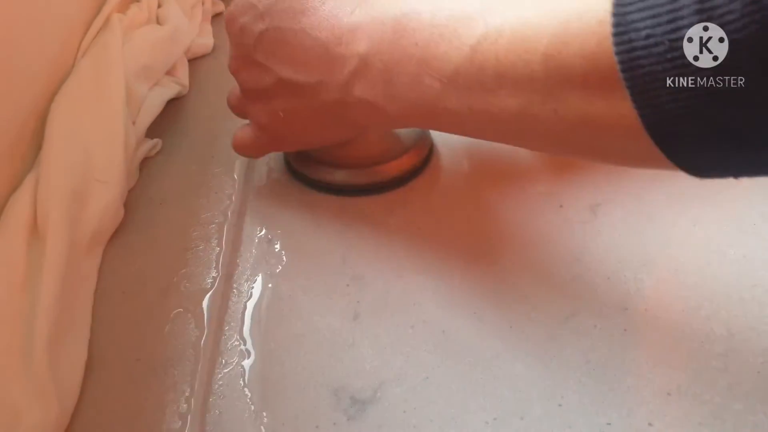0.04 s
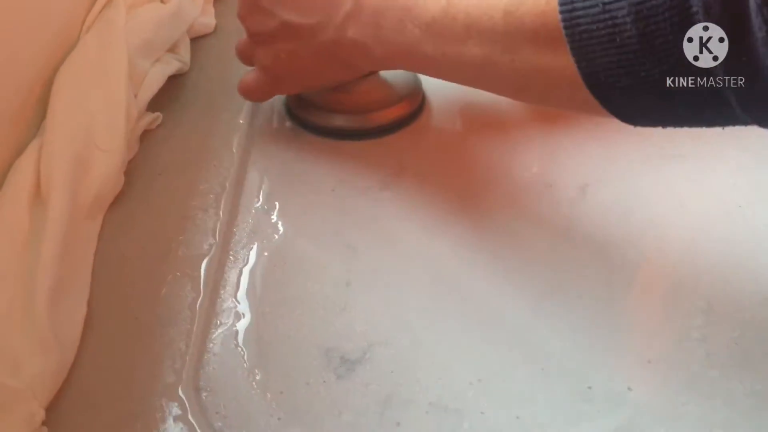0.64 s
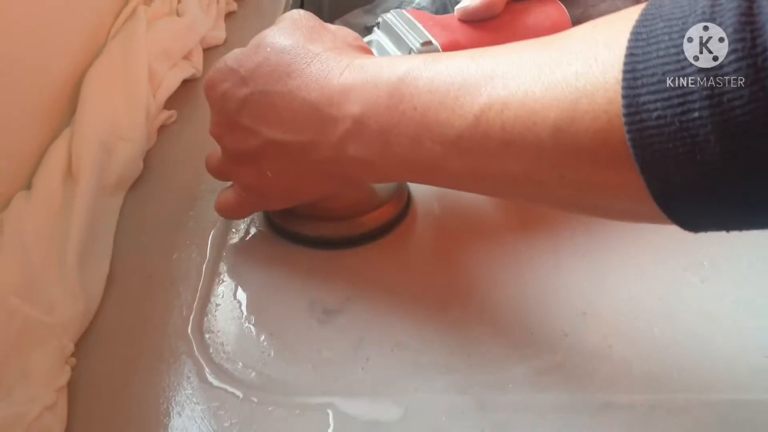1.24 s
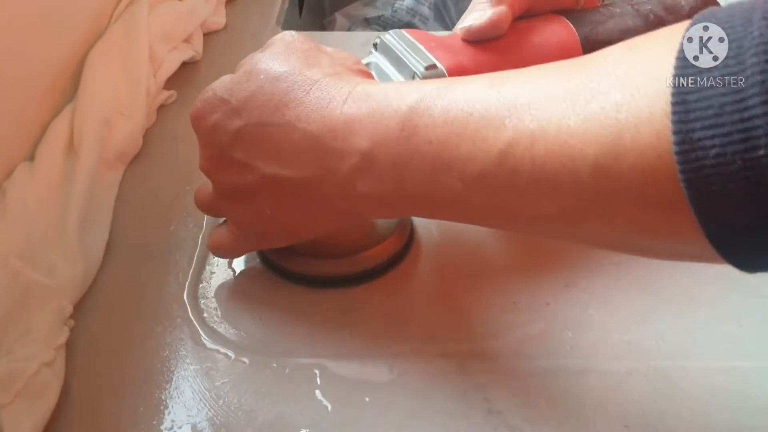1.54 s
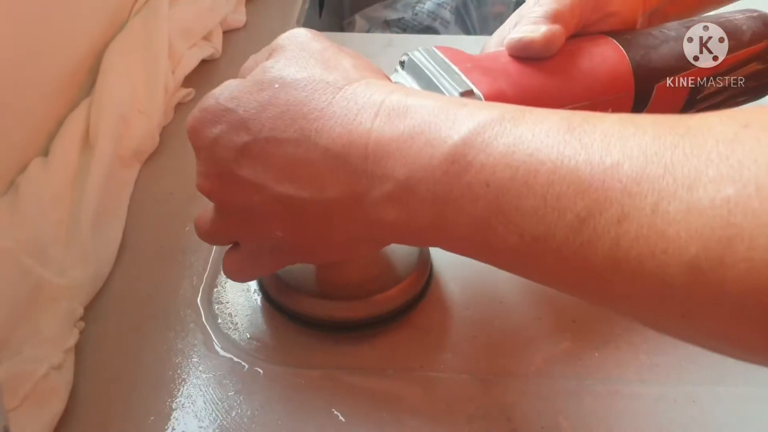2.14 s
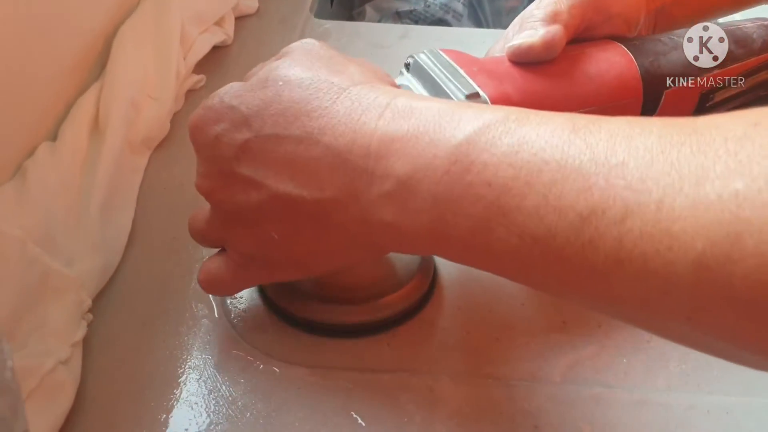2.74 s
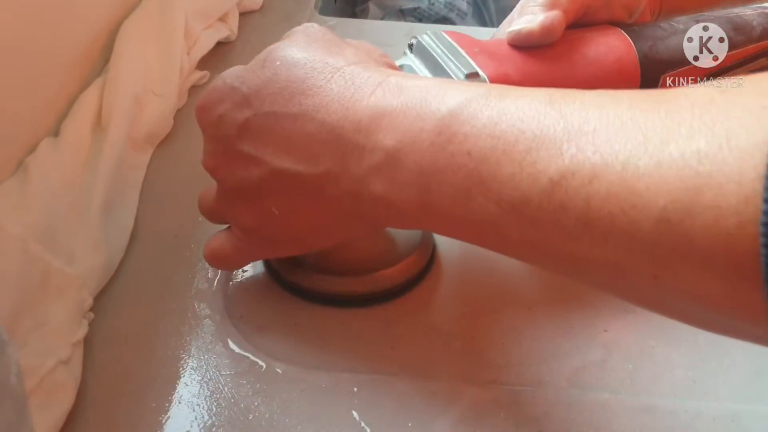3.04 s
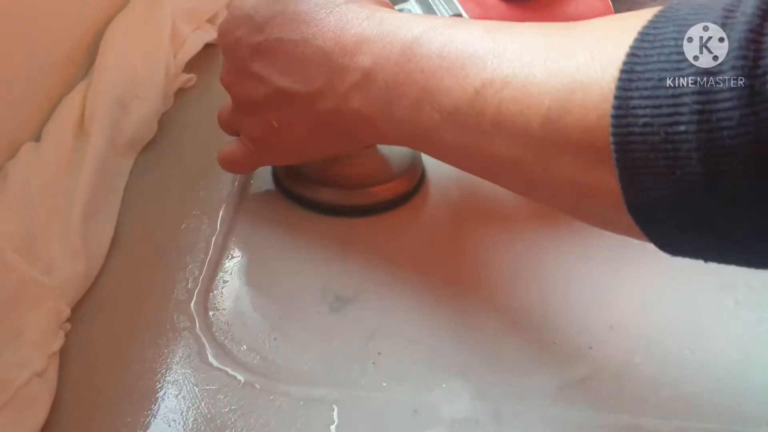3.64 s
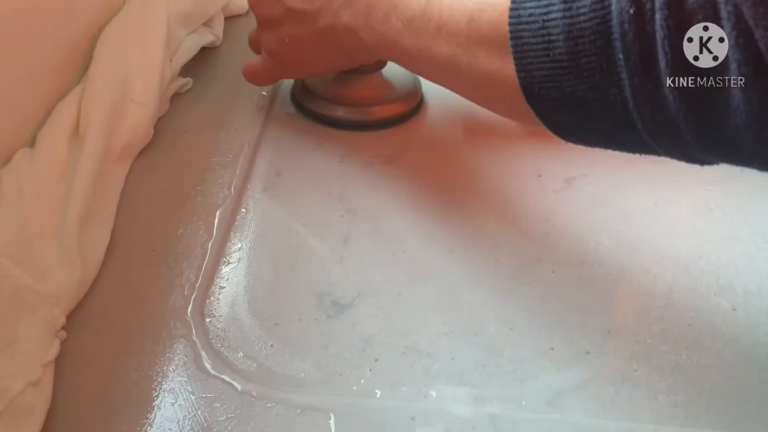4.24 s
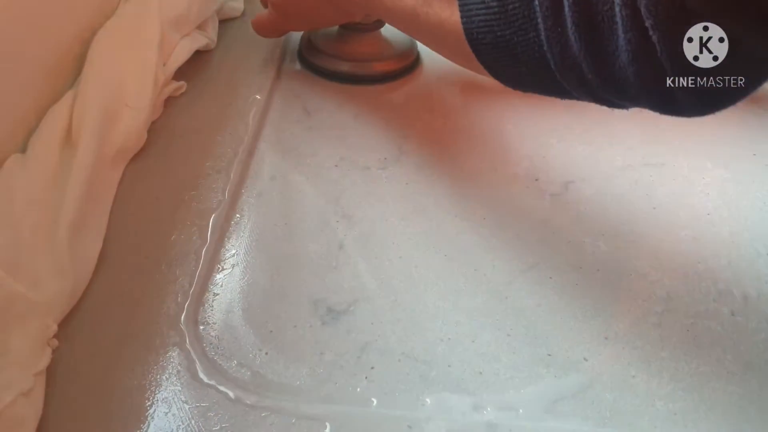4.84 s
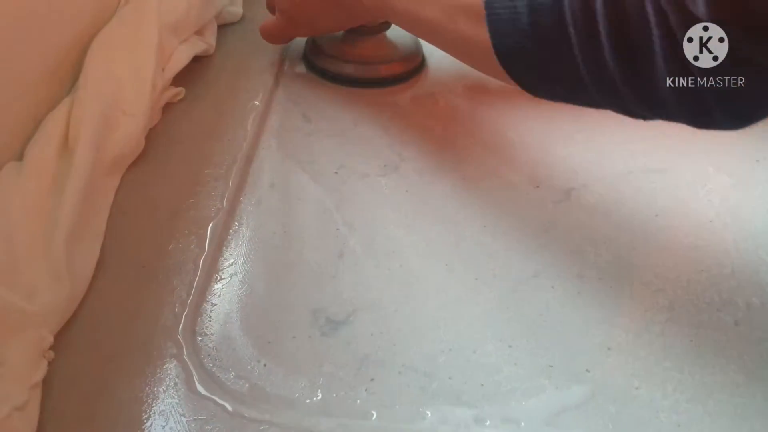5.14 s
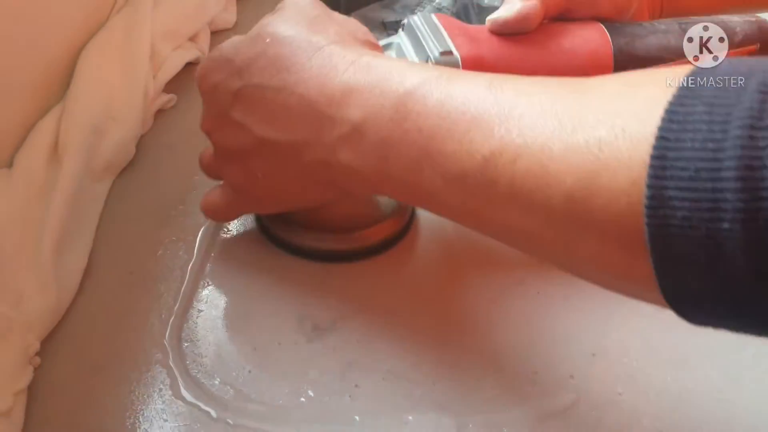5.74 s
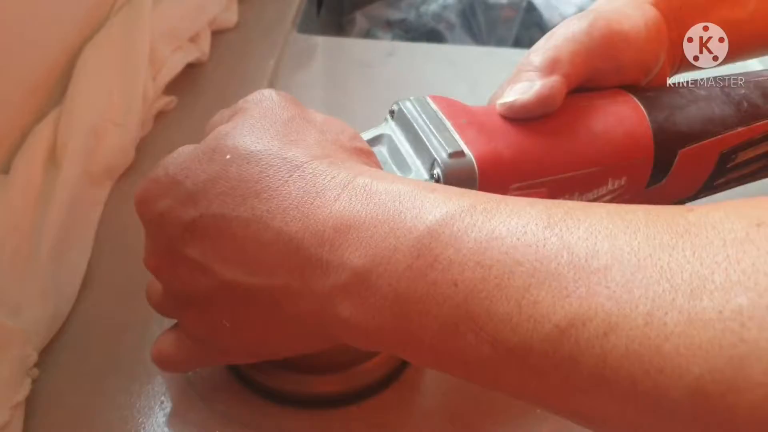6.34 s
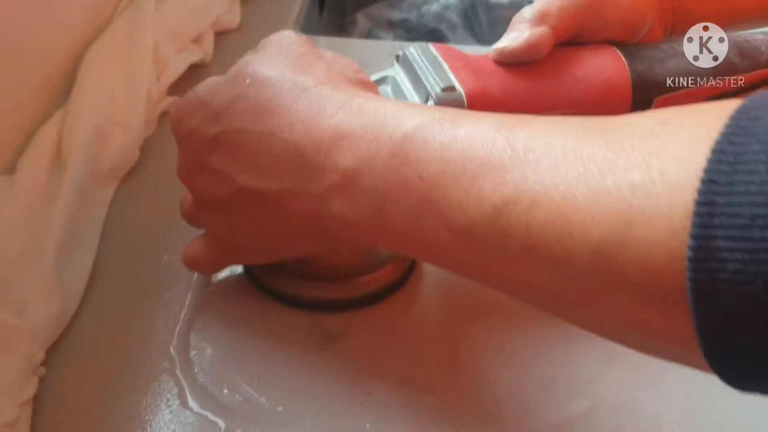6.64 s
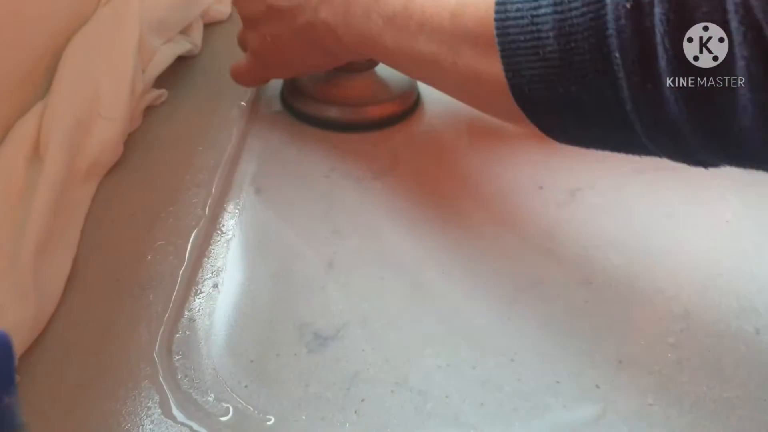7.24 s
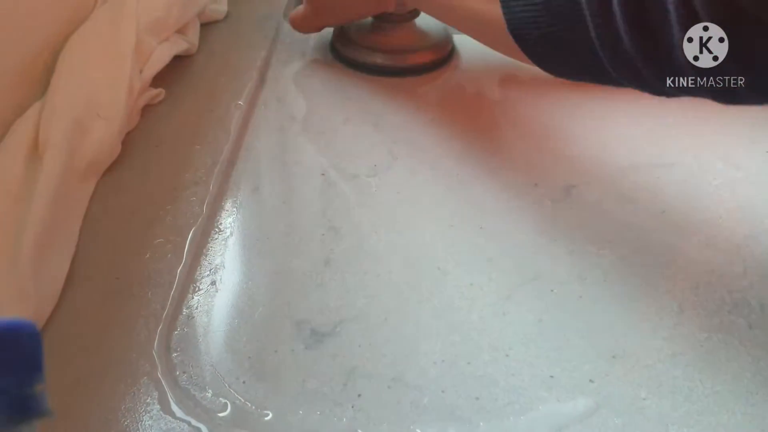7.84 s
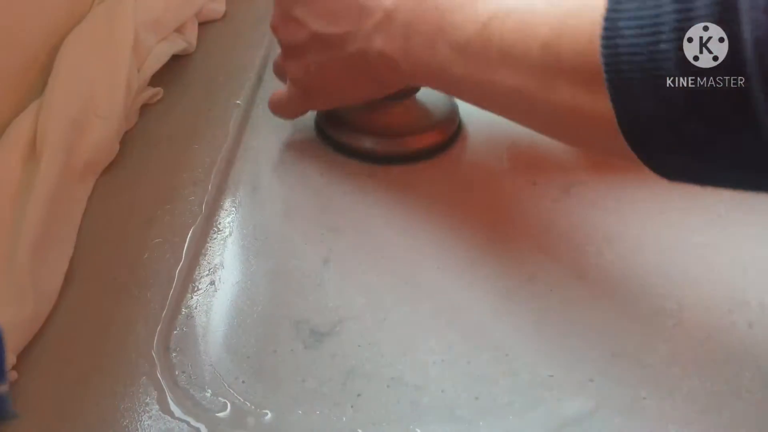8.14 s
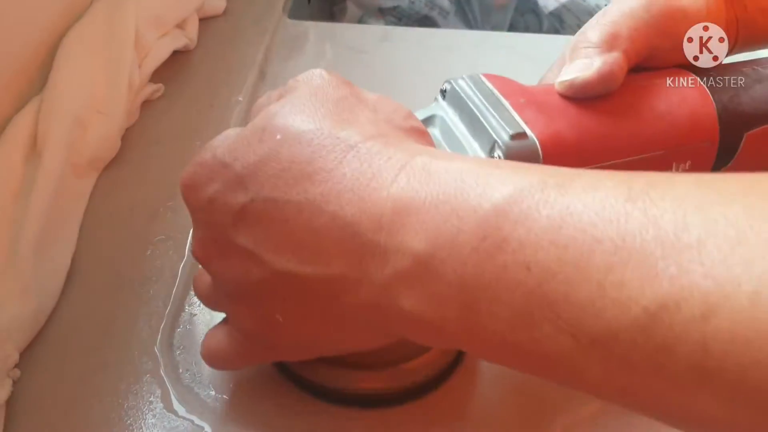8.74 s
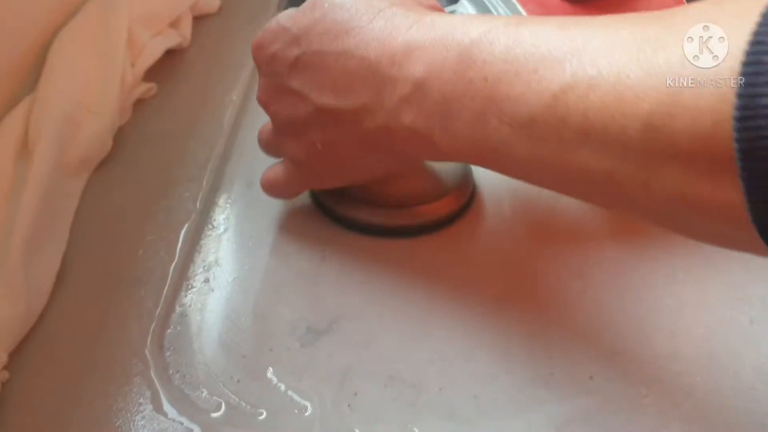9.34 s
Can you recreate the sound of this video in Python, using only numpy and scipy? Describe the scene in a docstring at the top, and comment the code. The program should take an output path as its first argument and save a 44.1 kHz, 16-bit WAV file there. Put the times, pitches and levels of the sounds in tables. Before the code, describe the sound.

A handheld orbital sander works a wet panel with a harsh, rattling buzz and hiss over a low hum. About two seconds in the pressure eases: the hum drops away, the gears clack lightly and the motor speeds up with a faint whine. The hum returns and sanding continues, swelling and fading with each stroke, with a few faint high squeaks of grit. It is heard close, mostly on the left, in a small room.

```python
"""A low hum under a harsh buzz: a handheld orbital sander on a wet panel, close by in a small room.
The pad's orbit makes the panel hum and rubs through slurry. The speed control fires the motor on every
half cycle of the mains, so gears and brushes buzz in surges. About two seconds in, the hand eases off
once: the hum drops away, slack gears clack, and the unloaded motor speeds up and whines.
The left microphone is close to the tool; the right one hears it weaker, with more of the walls."""
import sys
import numpy as np
from scipy import signal
from scipy.fft import rfft, irfft, next_fast_len
from scipy.io import wavfile
from scipy.ndimage import uniform_filter1d, map_coordinates

SR = 44100
rng = np.random.default_rng(int(sys.argv[2]) if len(sys.argv) > 2 else 0)


def unload_wav(signal):
    """Save mono or channel-first audio to the path in sys.argv[1] as 16-bit WAV at rate SR, clipped to [-1, 1]."""
    wavfile.write(
        sys.argv[1],
        SR,
        np.round(np.clip(np.atleast_2d(signal).T, -1, 1) * 32767).astype(np.int16),
    )


N = 418495
FIRING_HZ, FIRST_FIRING_S = 99.938, .0082  # one firing per half cycle of the mains
PINION_TEETH, WHEEL_TEETH = 11, 39
TOP_HZ = 15650


def amp(db):
    """Decibels to gain."""
    return 10 ** (np.asarray(db) / 20)


def unit(x):
    """Scale to rms 1."""
    return x / np.sqrt(np.mean(x ** 2) + 1e-20)


def along(points, hz):
    """Interpolate (Hz, value) points on a log frequency axis."""
    freqs, values = np.transpose(points)
    return np.interp(np.log(hz + 1), np.log(freqs + 1), values)


def curves(rows):
    """One value per sample for each column after the time."""
    times, *columns = np.transpose(rows)
    return [np.interp(np.arange(N) / SR, times, column) for column in columns]


def wobble(rate):
    """A smooth random curve, rate knots a second."""
    knots = rng.standard_normal(int(N * rate / SR) + 4)
    return map_coordinates(knots, [np.arange(N) * rate / SR])


def filtered(x, response):
    """Pass x through a complex response of frequency."""
    size = next_fast_len(N + SR // 4, True)
    return irfft(rfft(x, size) * response(np.fft.rfftfreq(size, 1 / SR)), size)[..., :N]


def coloured(x, spectrum):
    """Shape x by (Hz, dB) points, at rms 1."""
    return unit(filtered(x, lambda f: amp(along(spectrum, f))))


def resonance(f, hz, width):
    """Response of one damped mode."""
    return 1j * f * width / (hz * hz - f * f + 1j * f * width)


def impacts(per_second):
    """Dense random contacts of random size."""
    return rng.standard_normal(N) * (rng.random(N) < per_second / SR)


def on_spot(near, spot, reach):
    """1 with the pad on a spot, fading to either side."""
    return np.exp(-((near - spot) / reach) ** 2)


def since_firing():
    """Seconds since the speed control last fired."""
    return (np.arange(N) / SR - FIRST_FIRING_S) * FIRING_HZ % 1 / FIRING_HZ


def surge(peak_s, depth_db):
    """Gain that swells once in each half cycle of the mains."""
    return unit(amp(depth_db * np.cos(2 * np.pi * FIRING_HZ * (since_firing() - peak_s))))


# The pad's path over the panel. Each row: time in seconds, nearness from 0 (far end) to 1 (near end),
# offset from 0 (left edge) to 1 (right edge).
PAD_PATH = [(0, 0.15, 0.78), (.3, 0.39, 0.74), (.55, 0.16, 0.54), (1, 0.36, 0.4), (1.6, 0.63, .2),
            (2.85, 0.8, 0.2), (3.75, 0.39, 0.1), (4.35, 0.17, 0.06), (5.2, 0.01, 0.22), (6.27, 0.95, 0.24),
            (7.05, 0.35, 0.24), (7.5, 0.09, 0.76), (8.02, 0.02, 0.98), (8.75, 0.92, 1), (9.49, 0.54, 0.71)]


def stroke(turn_s=0.42):
    """The hand turns round gently: nearness, offset, and pulling speed in stroke lengths a second."""
    near, offset = (uniform_filter1d(c, int(turn_s * SR), mode="nearest") for c in curves(PAD_PATH))
    return near, offset, np.gradient(near) * SR


# How hard the hand leans on the pad. Each row: time in seconds, pressure in dB.
HAND_PRESSURE = [(0, 5.5), (.3, 4), (1.15, 3.5), (1.68, -3.5), (1.82, -50.5), (2.3, -92), (2.56, -68),
                 (2.62, -40), (2.71, -37), (2.76, -20), (2.95, -6.5), (3.2, 2), (5.5, -2), (6.6, 1.5),
                 (8.3, -4), (9.2, 1)]
FULL_LOAD_DB, IDLE_LOAD = -12.5, .3  # pressure that loads the motor fully; share left when lifted


def loading(db_per_db=0.495):
    """Share of full load on the motor, growing with the hand's pressure."""
    pressure_db, = curves(HAND_PRESSURE)
    return np.clip(amp(db_per_db * (pressure_db - FULL_LOAD_DB)), IDLE_LOAD, 1)


def idling():
    """0 while the motor works, 1 while it runs free."""
    return uniform_filter1d((1 - loading()) / (1 - IDLE_LOAD), size=SR // 12)


# The speed control's drifting setting. Each row: time in seconds, rotor turns a second.
SPEED_SETTING = [(0, 165.4), (1.8, 165.3), (4.3, 164), (5.5, 165), (6.7, 165.1), (8.1, 163.8), (9.2, 165.2)]


def rotor_speed(governor_s=1.15, near_gain_hz=.6, free_gain_hz=6.8):
    """The freed rotor races; the speed control slowly reins it in, so it sags when the load returns."""
    free = idling()
    step = 1 / (governor_s * SR)
    reined = signal.lfilter([step], [1, step - 1], free)
    setting, = curves(SPEED_SETTING)
    return setting + near_gain_hz * stroke()[0] + free_gain_hz * (free - reined) + 0.1995 * wobble(12)


# The small room around the microphones. Each row: frequency in Hz, seconds to die away by 60 dB.
ROOM_DECAY = [(200, .16), (2000, .17), (12000, .13)]


def room(x):
    """The nearby walls give each microphone its own tail, which changes as the tool moves."""
    out, step = np.zeros((2, N + 2 * SR)), SR // 4
    padded, fade = np.pad(x, (step, 2 * step)), np.sqrt(np.hanning(2 * step))
    for start in range(0, N + step, step):
        hz, t, noise = signal.stft(rng.standard_normal((2, SR // 5)), SR, nperseg=256)
        decay = amp(-60 * t / along(ROOM_DECAY, hz)[:, None])
        tail = signal.istft(noise * decay, SR, nperseg=256)[1]
        piece = fade * padded[start:start + 2 * step]
        wet = signal.fftconvolve(piece[None], tail / np.linalg.norm(tail[0]), axes=1)
        out[:, start:start + wet.shape[1]] += wet
    return out[:, step:step + N]


# Air from the tool's fan, heard close. Each row: frequency in Hz, relative level in dB.
FAN_SPECTRUM = [(25, -38), (130, -34), (220, -9), (330, 1.5), (430, -2.5), (600, -2.5), (880, -8.5),
                (1100, 2.5), (2100, 0), (3000, -2), (4500, -15.5), (5600, -5.5), (7000, -16), (8500, -18),
                (15000, -28)]


def fan(level_db):
    """The cooling fan blows a steady rush of air."""
    return amp(level_db) * coloured(rng.standard_normal(N), FAN_SPECTRUM)


# Squeaks from under the pad. Each row: start in seconds, relative level in dB, pitch in Hz.
GRIT_SQUEAKS = [(0.6195, -27, 10900), (1.048, -33, 11700), (2.202, -23, 11800), (2.1241, -35, 10800),
                (2.5386, -30, 11700), (4.0093, -31.5, 11600), (4.3904, -32.5, 11600), (5.87, -27, 11900),
                (8.6018, -31, 11710), (8.8922, -32, 10800)]


def grit(gain_db, t60_s):
    """Grit trapped between pad and panel gives short, high, rough squeaks."""
    t = np.arange(SR // 10) / SR
    attack = 1 - np.exp(-t / 0.001)
    out = np.zeros(N)
    for start, db, hz in GRIT_SQUEAKS:
        phase = 2 * np.pi * hz * t + np.cumsum(0.25 * rng.standard_normal(len(t)))
        out[round(start * SR):][:len(t)] += amp(db + gain_db - 60 * t / t60_s) * attack * np.sin(phase)
    return out


# Clacks while the tool is eased off the panel. Each row: start in seconds, relative level in dB.
GEAR_CLACKS = [(1.8826, -17), (1.9387, -17), (1.9562, -14.5), (2.1096, -16), (2.1256, -14), (2.1444, -19),
               (2.1924, -23), (2.2035, -13.5), (2.222, -17), (2.2744, -27), (2.3503, -23), (2.3907, -20),
               (2.5393, -16), (2.6, -16)]
# The gear case they sound through. Each row: frequency in Hz, gain in dB.
GEAR_CASE = [(100, -28), (300, -16), (700, -13), (1200, -5.5), (2000, 5.5), (3200, -6), (4400, -4),
             (5700, 2), (6800, -5), (8300, -22), (15000, -28)]


def slack_gears(gain_db, t60_s):
    """Slack teeth clack against each other inside the gear case."""
    t = np.arange(SR // 10) / SR
    clacks = np.zeros(N)
    for start, db in GEAR_CLACKS:
        envelope = amp(db + gain_db - 60 * t / t60_s)
        clacks[round(start * SR):][:len(t)] += envelope * rng.standard_normal(len(t))
    return filtered(clacks, lambda f: amp(along(GEAR_CASE, f)))


# The hiss close to the motor. Each row: frequency in Hz, relative level in dB.
BRUSH_SPECTRUM = [(2000, -8), (6000, -7), (8600, -9), (10000, -3), (11300, 1), (12500, 0), (14000, -0.5),
                  (15600, -3.5)]


def brushes(hiss_db, near_db, idle_db, spark, spark_s, surge_db):
    """The brushes spit just after each firing and hiss while current flows."""
    age = since_firing() / spark_s
    current = surge(0.0033, surge_db) + spark * age * np.exp(1 - age)
    hiss = coloured(current * impacts(14000), BRUSH_SPECTRUM)
    return amp(hiss_db + near_db * stroke()[0] + idle_db * idling()) * hiss


def rotor_whine(rotor, speed, load_db, race_db, race_hz, fall_db_per_hz, unbalance_db):
    """The unbalanced rotor hums faintly; its whine swells as its speed nears race_hz."""
    gain = amp(load_db) * loading() + amp(race_db - fall_db_per_hz * np.abs(speed - race_hz))
    whine = unit(np.sin(2 * np.pi * 39 * rotor))  # 39 cycles a turn
    hum = unit(np.sin(2 * np.pi * rotor))
    return gain * amp(1.5 * wobble(30)) * whine + amp(unbalance_db) * hum


def gear_mesh(rotor, mesh_db, spot_db, drag_db, idle_db, surge_db):
    """The teeth's tone throbs with the torque and grows as the pad travels, either way."""
    near, _, pull = stroke()
    passed = on_spot(near, spot=0.4, reach=0.14)  # where the panel passes the tone best
    level_db = mesh_db + spot_db * passed + drag_db * np.abs(pull) + idle_db * idling()
    tone = np.sin(2 * np.pi * PINION_TEETH * rotor + 0.26 * wobble(45))
    return amp(level_db) * unit(tone * surge(0.0054, surge_db) * amp(2.7 * wobble(20)))


# Modes of the motor's iron and of its end cap. Each row: frequency in Hz, width in Hz,
# relative level in dB.
IRON_MODES = [(810, 46, -6), (1124, 240, -2.5), (1512, 120, -5.5), (1900, 350, -2.5), (2308, 94, -1.5),
              (2650, 350, 0), (3073, 440, -1.5)]
CAP_MODES = [(3770, 280, 0)]


def stator(knock_db, near_db, idle_db, cap_db, cap_idle_db, scatter_db, polarity, skew_s):
    """Each firing jerks the iron; the two directions of current differ in strength and timing."""
    index = np.arange(int((N / SR - FIRST_FIRING_S) * FIRING_HZ))
    times, side = FIRST_FIRING_S + index / FIRING_HZ, (-1) ** index
    # under load the control hunts, so the firings scatter a little
    hunting_s = 6e-5 * loading()[(times * SR).astype(int)] * rng.standard_normal(len(index))
    samples = np.round((times + side * skew_s + hunting_s) * SR).astype(int)
    kicks = np.zeros(N)
    kicks[samples] = (1 + polarity * side) * amp(scatter_db * rng.standard_normal(len(index)))

    def ring(modes):
        response = lambda f: sum(amp(db) * resonance(f, hz, width) ** 2 for hz, width, db in modes)
        return unit(filtered(kicks, response))

    free = idling()
    iron = amp(knock_db + near_db * stroke()[0] + idle_db * free) * ring(IRON_MODES)
    return iron + amp(cap_db + cap_idle_db * free) * ring(CAP_MODES)


def panel_bounce(x, share, delay_s, drift):
    """A bounce off the panel, whose path changes as the tool moves, sweeps notches through the sound."""
    lag = SR * delay_s * (1 + drift * wobble(1.6))
    bounce = map_coordinates(x, [np.arange(N) - lag], order=1)
    return (x + share * bounce) / np.sqrt(1 + share ** 2)


# The rattle close to the gears. Each row: frequency in Hz, relative level in dB.
RATTLE_SPECTRUM = [(200, -29), (560, -29), (680, -9), (900, -0.5), (1100, 1.5), (1500, 0.5), (2250, -2),
                   (3300, -3.5), (3700, 0), (4900, -1), (6400, -0.5), (7200, -8), (8300, -21.5),
                   (11000, -25)]
# Panel and housing modes, each strongest with the pad on its own spot. Each row: frequency in Hz, width
# in Hz, relative level in dB, the spot's nearness and reach (0-1), dB gained from left edge to right.
PANEL_MODES = [(681.5, 55, -51.5, 0.22, 0.26, 2), (1140, 240, -45, 0.82, 0.34, 5),
               (1403, 380, -46.5, 0.06, 0.23, -14), (1658, 350, -47.5, 0.13, 0.6, 15),
               (1840, 290, -47, 0.43, 0.38, -6), (2030, 280, -46, 0.8, .22, 12),
               (2510, 370, -42, 0.37, 0.38, 1.5), (3110, 550, -45.5, .12, .25, -7.5),
               (3990, 590, -44, 0.2, 0.29, 17.5), (4250, 600, -43.5, 0.75, 0.44, 5),
               (4680, 310, -43, 0.91, 0.18, 0), (5700, 550, -46, 0.75, 0.22, -8),
               (5800, 480, -39, .34, 0.07, 6), (6290, 500, -46.5, 0.23, 0.29, -2)]


def gear_rattle(orbit, rattle_db, near_db, idle_db, ring_db, wander_db):
    """Teeth rattle with each surge of torque and each swing of the pad, and ring panel and housing."""
    load = loading()
    near, offset, _ = stroke()
    swing = amp(2.3 * load * np.sin(4 * np.pi * orbit))
    force = surge(.0037, 3.9 * load) * swing * amp(1.3 * wobble(130))
    per_second = 26000 * load ** 2  # contacts grow sparse and spiky when the load is off
    contacts = force * impacts(per_second) / np.sqrt(per_second)
    rattle = panel_bounce(coloured(contacts, RATTLE_SPECTRUM), share=.35, delay_s=.0014, drift=.07)
    out = amp(rattle_db + near_db * near + idle_db * idling()) * rattle
    drive = force * rng.standard_normal(N)
    for hz, width, db, spot, reach, across_db in PANEL_MODES:
        b, a = signal.iirpeak(hz, hz / width, SR)
        ring = unit(signal.lfilter(b, a, signal.lfilter(b, a, drive)))
        level_db = db + ring_db + across_db * (offset - .5) + wander_db * wobble(3.14)
        out += amp(level_db) * load * on_spot(near, spot, reach) * ring
    return out


# The low, wet rub on the panel. Each row: frequency in Hz, relative level in dB.
SLURRY_SPECTRUM = [(15, -18), (55, -16), (110, 8.5), (200, 1.5), (280, 0), (410, -1.5), (560, -15),
                   (900, -30), (3000, -62)]


def slurry(orbit, rub_db, near_db, pull_db, db_per_db, swirl_db):
    """The pad rubs through the slurry in each orbit, most when pressed and pulled."""
    near, _, pull = stroke()
    pressure_db, = curves(HAND_PRESSURE)
    swirl = amp(swirl_db * np.sin(2 * np.pi * orbit))
    rub = coloured(rng.standard_normal(N) * swirl, SLURRY_SPECTRUM)
    return amp(rub_db + near_db * near + pull_db * pull + db_per_db * pressure_db) * rub


# The panel's weaker hum tones. Each row: multiple of the orbit rate, level in dB against the third order.
HUM_ORDERS = [(1, -30.5), (4, -14.5), (5, -14.5), (6, -27.5)]


def panel_hum(orbit, second_db, second_far_db, third_db, third_far_db, pull_db, seat_db, flutter_db):
    """The pad shakes the panel at multiples of its orbit rate, most when near and pushed away."""
    near, offset, pull = stroke()
    pressure_db, = curves(HAND_PRESSURE)
    seated = amp(pressure_db) / np.hypot(amp(pressure_db), amp(seat_db))
    far = np.exp(-near / 0.31)  # 1 at the far end, fading over about a third of the stroke
    across_db = .5 - offset  # 1 dB weaker at the right edge than at the left
    second_level = second_db + second_far_db * far + across_db
    third_level = third_db + third_far_db * far + pull_db * pull + across_db + pressure_db
    order = lambda k: np.sqrt(2) * np.sin(2 * np.pi * (k * orbit + rng.random()))
    hum = seated * amp(second_level + flutter_db * wobble(18)) * order(2)
    hum += amp(third_level + flutter_db * wobble(19)) * order(3)
    for multiple, db in HUM_ORDERS:
        hum += amp(third_level + db + 3.6 * wobble(26)) * order(multiple)
    return hum


# The colour at the right microphone. Each row: frequency in Hz, gain in dB.
RIGHT_COLOUR = [(200, 0), (500, 1.8), (1200, -0.8), (5000, 0.5), (8500, -5), (12000, 0.5)]


def scene():
    """The tool close to the left microphone; the right one hears it weaker and more diffusely."""
    speed = rotor_speed()
    rotor = np.cumsum(speed) / SR  # in turns
    orbit = rotor * PINION_TEETH / WHEEL_TEETH
    panel = panel_hum(orbit, second_db=-23, second_far_db=-15.5, third_db=-27.5, third_far_db=-7,
                      pull_db=-3, seat_db=-10, flutter_db=.8)
    panel += slurry(orbit, rub_db=-38.5, near_db=0.9, pull_db=2.5, db_per_db=0.39, swirl_db=2.5)
    tool = gear_rattle(orbit, rattle_db=-33.5, near_db=2.5, idle_db=-6.5, ring_db=3.0, wander_db=0.15)
    tool += stator(knock_db=-37.5, near_db=-3.5, idle_db=-3.0, cap_db=-43.5, cap_idle_db=5.0,
                   scatter_db=1.7, polarity=0.092, skew_s=2.5e-5)
    tool += brushes(hiss_db=-40.5, near_db=1.7, idle_db=-3.5, spark=0.63, spark_s=0.00053, surge_db=0.5)
    tool += slack_gears(gain_db=-2.5, t60_s=.028)
    tool += grit(gain_db=1.5, t60_s=.04)
    tool += fan(level_db=-39)
    tones = gear_mesh(rotor, mesh_db=-43.5, spot_db=3, drag_db=3.5, idle_db=-15, surge_db=12.5)
    tones += rotor_whine(rotor, speed, load_db=-53.5, race_db=-42.0, race_hz=171.6, fall_db_per_hz=3.5,
                         unbalance_db=-62.5)
    walls = room(tool)
    left = panel + tones + tool + amp(-14) * walls[0]
    right = panel + tones + amp(-15) * tool + walls[1]
    right = filtered(right, lambda f: amp(along(RIGHT_COLOUR, f)))
    return np.array([amp(4.8) * left, amp(-9.7) * right])


def record(dry):
    """Both channels keep nothing above the band limit."""
    return filtered(dry, lambda f: f < TOP_HZ)


dry = scene()
out = record(dry)
unload_wav(out)
```